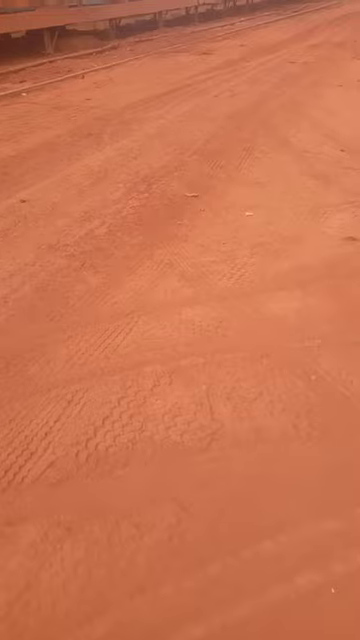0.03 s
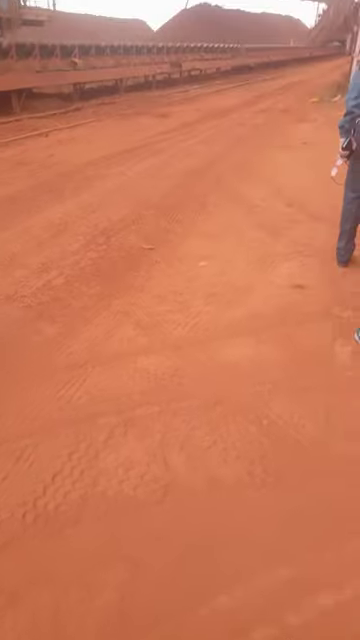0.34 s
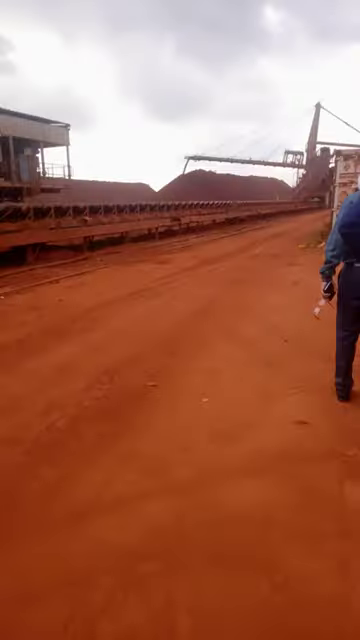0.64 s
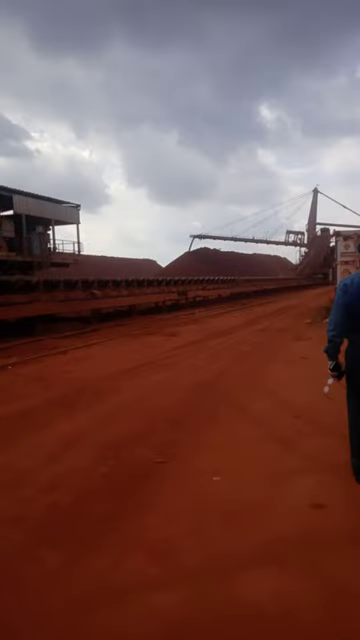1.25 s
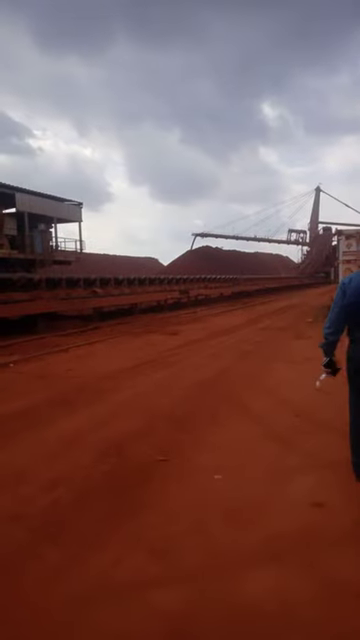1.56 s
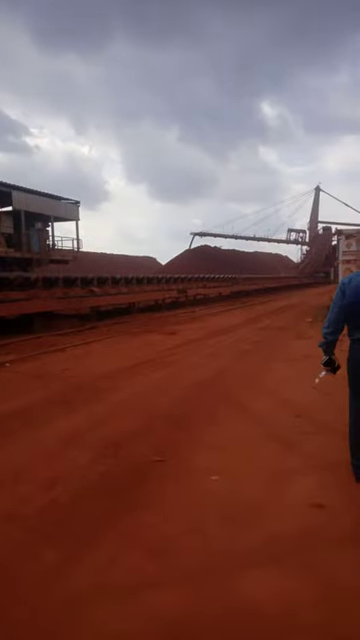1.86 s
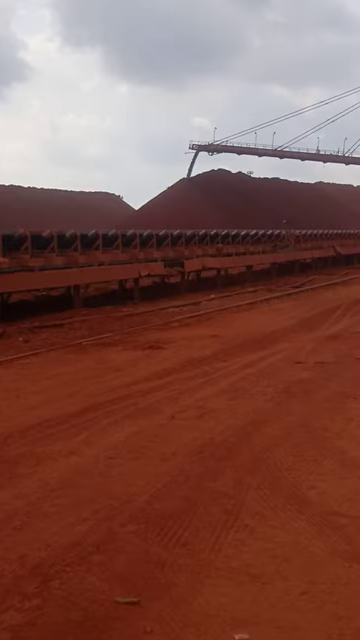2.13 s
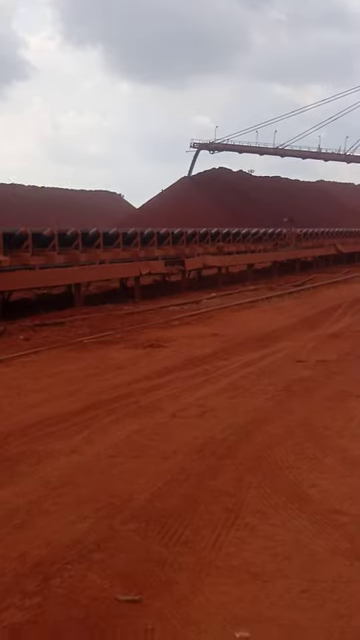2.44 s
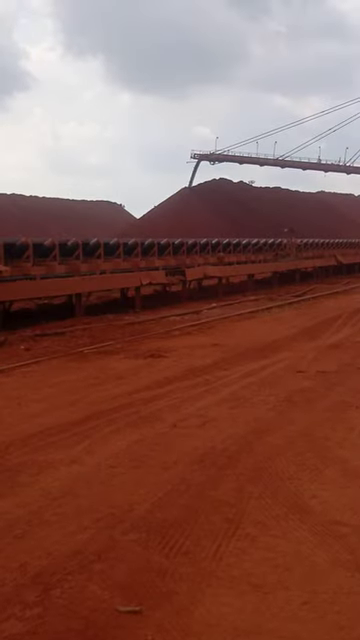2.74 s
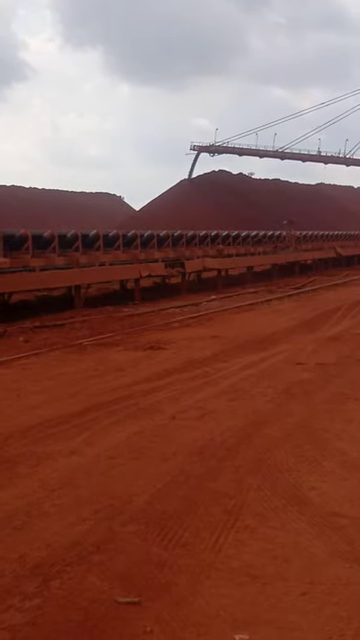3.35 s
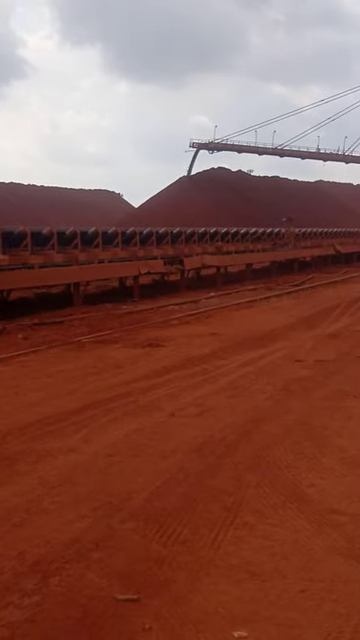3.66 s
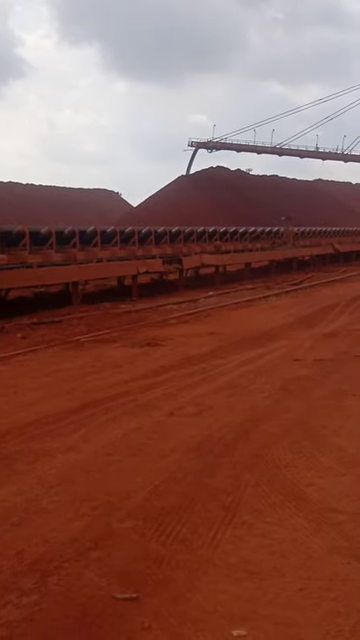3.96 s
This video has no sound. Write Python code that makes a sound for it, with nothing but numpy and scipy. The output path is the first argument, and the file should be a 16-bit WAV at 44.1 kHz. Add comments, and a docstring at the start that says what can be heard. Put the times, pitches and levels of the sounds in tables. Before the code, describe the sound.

High, pulsing squeal of a conveyor belt roller, with steady rumble and hiss behind it.

```python
"""One dry roller squeals on a long belt conveyor, heard from a single microphone in an open yard.
It sticks and slips, its pitch and overtones going through the same swing five times a second,
and the steel frame rings and scatters the squeal. Behind it the other rollers rumble and give
a few squeaks, the belt hisses, and grit ticks faintly on the steel."""
import sys
import numpy as np
from scipy import signal
from scipy.fft import rfft, irfft
from scipy.io import wavfile

SR = 44100
rng = np.random.default_rng(int(sys.argv[2]) if len(sys.argv) > 2 else 0)


def bounce(signal):
    """Save signal as a 16-bit WAV file at the path given by the first command-line argument."""
    frames = np.transpose(np.atleast_2d(signal))
    limited = np.clip(frames, -1, 1)
    pcm = np.round(limited * 32767).astype(np.int16)
    wavfile.write(sys.argv[1], SR, pcm)


N = 176400

# The warbling fundamental. Each row: share of the turn, pitch in Hz.
FUNDAMENTAL_PITCH = [(0.0, 2070), (0.12, 2099), (0.34, 2028), (0.42, 2052), (0.44, 2026), (0.54, 2085),
                     (0.6, 2061), (0.68, 2098), (0.74, 2053), (0.78, 2093), (0.84, 2052.1)]
# Its pulsing. Each row: share of the turn, level in dB.
FUNDAMENTAL_LEVEL = [(0, -34.5), (.16, -19), (.24, -20.5), (.31, -19.2), (.35, -24), (.395, -19),
                     (.44, -29.5), (.48, -19.5), (.56, -26.5), (.63, -23), (.68, -32), (.705, -25),
                     (.77, -33), (.84, -23.5), (.895, -21.3), (.965, -40)]
# It takes hold over the first turns. Each row: time in seconds, added gain in dB.
GRIP_GAIN = [(.3, -1), (.6, 0), (1.2, 1), (4, 0.7)]
# The octave stays low for longer. Each row: share of the turn, pitch in Hz.
OCTAVE_GLIDE = [(.12, 4198), (.28, 4155), (.35, 4095), (.45, 4080), (.56, 4098), (.68, 4144), (.9, 4140)]
# The octave's swing. Each row: share of the turn, level in dB.
OCTAVE_LEVEL = [(0, -49.5), (.1, -40.5), (.27, -43), (.33, -31.5), (.39, -37), (.43, -30.5), (.5, -31),
                (.55, -37), (.59, -31), (.67, -29), (.72, -35.5), (.77, -32.5), (.86, -44.5), (.92, -39)]
# The base that all higher overtones multiply. Each row: share of the turn, pitch in Hz.
BASE_PITCH = [(0.0, 2067.0), (0.1, 2089), (0.4, 2056.2), (0.42, 2043), (0.5, 2042), (0.6, 2076),
              (0.74, 2077), (0.8, 2068)]
# The fourth harmonic's swing. Each row: share of the turn, level in dB.
DOUBLE_OCTAVE_LEVEL = [(0, -57), (.07, -47), (.17, -50), (.28, -44.5), (.4, -53), (.48, -44), (.52, -47),
                       (.585, -31.5), (.65, -44.5), (.71, -38), (.8, -56)]
# The squeal's bright edge, strongest where the roller binds. Each row: share of the turn, level in dB.
EDGE_LEVEL = [(0, -66), (.11, -53.5), (.24, -56), (.38, -62), (.47, -51), (.59, -45), (.69, -50),
              (.78, -58), (.9, -62)]
# The overtones of that edge. Each row: multiple of the base pitch, gain in dB on the edge level.
EDGE_OVERTONES = [(3, 1), (5, 1), (6, 0), (7, -9.5)]
def squeal(t, turns):
    """Out in front, the dry roller sticks and slips; each turn repeats the swing of pitch and overtones."""
    jitter_hz = 7 * wander(rate_hz=216)

    def phase_of(pitch, jitter_scale=1):
        hz = curve(pitch, turns, period=1) + jitter_scale * jitter_hz
        return 2 * np.pi * np.cumsum(hz) / SR

    def wavering(levels):
        return undb(curve(levels, turns, period=1)) * flicker(spread_db=1.42, rate_hz=62)

    def rasping(phase):
        return np.sin(phase) + .27 * wander(rate_hz=254) * np.cos(phase)  # stick-slip flutter

    base_phase = phase_of(BASE_PITCH)
    grip = undb(curve(GRIP_GAIN, t))
    tone = grip * wavering(FUNDAMENTAL_LEVEL) * np.sin(phase_of(FUNDAMENTAL_PITCH))
    tone += wavering(OCTAVE_LEVEL) * rasping(phase_of(OCTAVE_GLIDE, jitter_scale=2.01))
    tone += wavering(DOUBLE_OCTAVE_LEVEL) * rasping(4 * base_phase)
    edge_db = curve(EDGE_LEVEL, turns, period=.99)  # comes a little earlier each turn
    for multiple, db in EDGE_OVERTONES:
        gain = undb(edge_db + db) * flicker(spread_db=3, rate_hz=85)
        roughness_rad = .25 * wander(rate_hz=254)
        tone += gain * rasping(multiple * base_phase + roughness_rad)
    return np.sqrt(2) * tone


# The dry roller's speed. Each row: time in seconds, turns per second.
ROLLER_SPEED = [(0, 5.09), (1.5, 5.057), (2.7, 5.025), (4, 5.021)]
def rotation(t, turn_start_s=.287):
    """The dry roller slows very slightly; its turns are counted from turn_start_s."""
    turns = np.cumsum(curve(ROLLER_SPEED, t)) / SR
    return turns - np.interp(turn_start_s, t, turns)


def scrape(turns, centre_turns=.12, spread_turns=.086):
    """Early in each turn the roller rubs roughly before the squeal takes hold."""
    offset = (turns - centre_turns + .5) % 1 - .5
    return ringing(hz=4220, width_hz=130, db=-42) * np.exp(-(offset / spread_turns) ** 2)


def steelwork_echo(sound, t, t60_s=.23, delay_s=.019, low_cut_hz=3400):
    """The steelwork sends the treble back to the microphone as a short scatter and one reflection."""
    tail = rng.standard_normal(N) * np.exp(-np.log(1000) * t / t60_s)
    scatter = undb(-12) * signal.fftconvolve(sound, tail / np.linalg.norm(tail))[:N]
    reflection = undb(-10) * np.interp(t - delay_s, t, sound, left=0)  # beats with the gliding overtones
    return shape(scatter + reflection, lambda f: 1 / (1 + (low_cut_hz / f) ** 4))


# Resonances of the conveyor's frame. Each row: frequency in Hz, width in Hz, level in dB.
FRAME_MODES = [(2220, 70, -42.5), (4220, 83, -44.5), (3860, 80, -59), (6250, 140, -55), (12350, 230, -58)]
def frame_ring():
    """The rubbing keeps the steel frame ringing."""
    return sum(ringing(hz, width_hz, db) for hz, width_hz, db in FRAME_MODES)


# Stray squeaks. Each row: centre and spread in seconds, pitch and width in Hz, level at the centre in dB.
STRAY_SQUEAKS = [(.313, 0.031, 4420, 170, -39.5), (.642, .005, 6500, 250, -36.5),
                 (3.725, .032, 2996, 24, -40)]
def squeaks(t):
    """Elsewhere along the conveyor, other rollers squeak briefly."""
    return sum(ringing(hz, width_hz, db) * np.exp(-((t - centre_s) / spread_s) ** 2)
               for centre_s, spread_s, hz, width_hz, db in STRAY_SQUEAKS)


# The belt's rumble on its rollers. Each row: frequency in Hz, relative spectral level in dB.
RUMBLE_SPECTRUM = [(15, -63), (25, -45), (85, -7), (146, -7), (213, -5), (311, -2), (353, -4.5),
                   (379, -3.5), (606, -14), (700, -12), (794, -9), (985, -9.5), (1390, -17), (1850, -10.5),
                   (2400, -56), (4070, -120)]
# The belt's hiss. Each row: frequency in Hz, relative spectral level in dB.
HISS_SPECTRUM = [(1600, -20), (1900, -1.5), (2300, -2.5), (2700, -9), (3200, -17), (4700, -22.5),
                 (5400, -23.5), (6500, -18), (7700, -17.5), (9500, -27.5), (11500, -28.5), (15500, -34)]
# Hollow resonances of the other rollers. Each row: frequency in Hz, width in Hz, level in dB.
SHELL_MODES = [(319, 24.4, -33.5), (802, 42, -41.5), (99, 31, -45)]
def belt():
    """Behind the squeal the belt rumbles and hisses over booming rollers, swelling a little with its load."""
    rumble = level(coloured(RUMBLE_SPECTRUM) * flicker(spread_db=.7, rate_hz=11.3), db=-25)
    hiss = level(coloured(HISS_SPECTRUM) * flicker(spread_db=.7, rate_hz=23), db=-34.5)
    shells = sum(ringing(hz, width_hz, db) for hz, width_hz, db in SHELL_MODES)
    surges = flicker(spread_db=2, rate_hz=4.8)
    load_swell = flicker(spread_db=.38, rate_hz=2.5)
    return (rumble + hiss + shells * surges) * load_swell


def grit(t, hits_per_s=90, decay_s=.002):
    """Far under the rest, crumbs of ore tick on the steel, a few much harder than the others."""
    hits = rng.random(N) < hits_per_s / SR
    strength_db = 5.6 * np.minimum(rng.exponential(size=N), 4)
    envelope = signal.fftconvolve(hits * undb(strength_db), np.exp(-t / decay_s))[:N]
    ticks = envelope * rng.standard_normal(N)
    return level(resonate(ticks, hz=7000, width_hz=2000), db=-59)


def undb(db):
    """Decibels to gain."""
    return 10 ** (np.asarray(db) / 20)


def level(x, db):
    """Set the rms level."""
    return x * undb(db) / np.sqrt(np.mean(x ** 2))


def curve(table, at, period=None):
    """Join the rows of a table by straight lines."""
    return np.interp(at, *np.array(table, float).T, period=period)


def shape(x, gain):
    """Filter by a gain given as a function of frequency."""
    hz = np.maximum(np.arange(N // 2 + 1) * SR / N, 1)
    return irfft(rfft(x) * gain(hz), N)


def wander(rate_hz):
    """Smooth random motion with an rms of 1, mostly slower than rate_hz."""
    return level(shape(rng.standard_normal(N), lambda f: 1 / (1 + (f / rate_hz) ** 4)), db=0)


def flicker(spread_db, rate_hz):
    """A gain that wanders around 1."""
    return undb(spread_db * wander(rate_hz))


def resonate(x, hz, width_hz):
    """A resonance applied twice, for steep skirts."""
    return shape(x, lambda f: 1 / (1 + 1j * (f / hz - hz / f) * hz / (2 * width_hz)) ** 2)


def ringing(hz, width_hz, db):
    """One steel resonance kept ringing by the noise of contact."""
    return level(resonate(rng.standard_normal(N), hz, width_hz), db)


def coloured(spectrum):
    """Noise with a spectrum of (Hz, dB) points, falling steeply beyond its ends."""
    hz, db = np.array(spectrum, float).T

    def gain(f):
        rolloff = np.sqrt((1 + (f / hz.max()) ** 40) * (1 + (hz.min() / f) ** 8))
        return undb(np.interp(np.log(f), np.log(hz), db)) / rolloff

    return shape(rng.standard_normal(N), gain)


def scene():
    """From one spot in the yard, in mono: the squealing roller and its echo over the running belt."""
    t = np.arange(N) / SR
    turns = rotation(t)
    rollers = squeal(t, turns) + scrape(turns) + squeaks(t)
    return (rollers + steelwork_echo(rollers, t) + frame_ring() + belt() + grit(t))[None]


# The fade-in at the microphone. Each row: time in seconds, gain in dB.
FADE_IN = [(.076, -100), (.083, -20.5), (.12, -12), (.17, -9.5), (.28, -5), (.315, -2), (.38, -1.5)]
def record(dry, top_hz=15500):
    """The microphone's level opens in two steps at the start, and the highest treble is cut."""
    opened = dry * undb(curve(FADE_IN, np.arange(N) / SR))
    lowpass = signal.ellip(10, .2, 80, top_hz, fs=SR, output="sos")
    return signal.sosfilt(lowpass, opened)


dry = scene()
out = record(dry)
bounce(out)
```